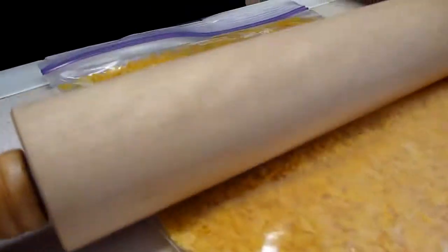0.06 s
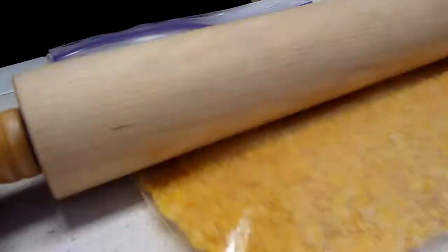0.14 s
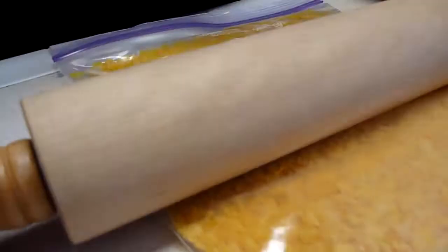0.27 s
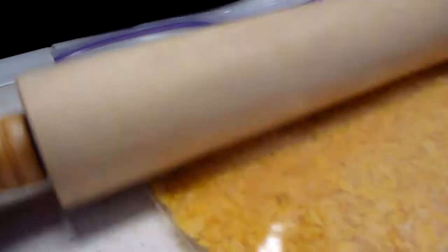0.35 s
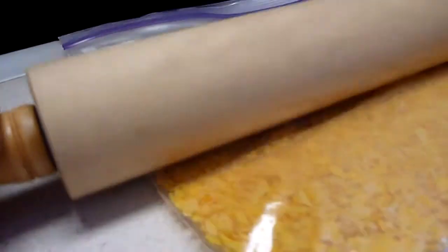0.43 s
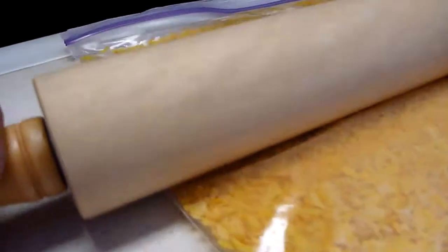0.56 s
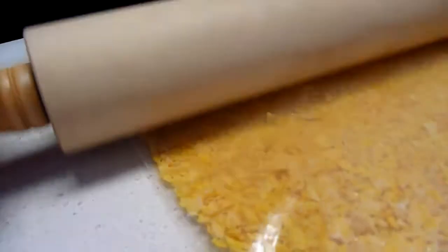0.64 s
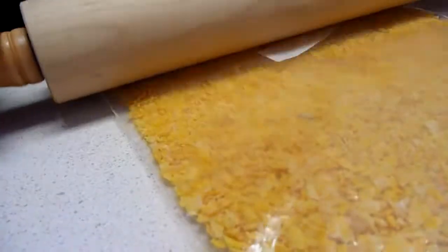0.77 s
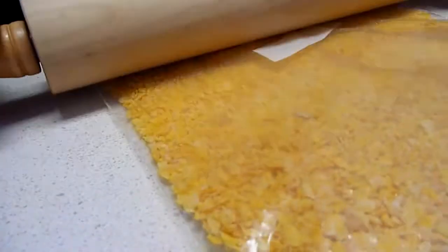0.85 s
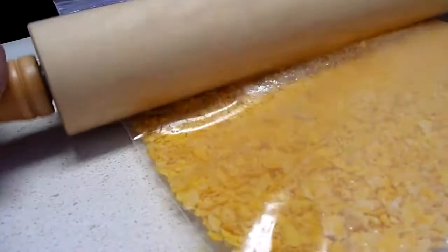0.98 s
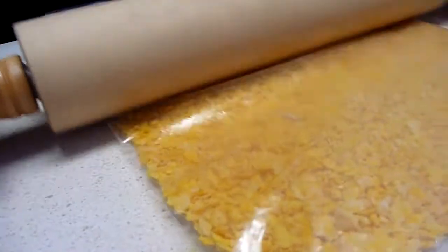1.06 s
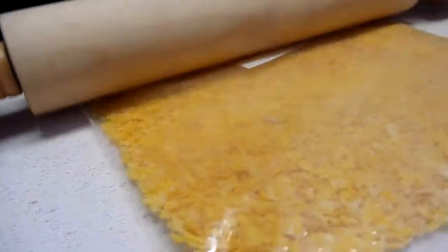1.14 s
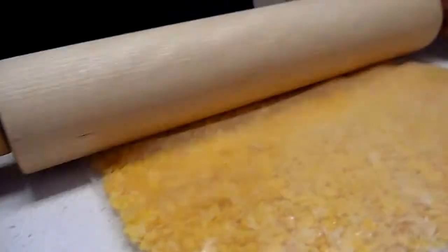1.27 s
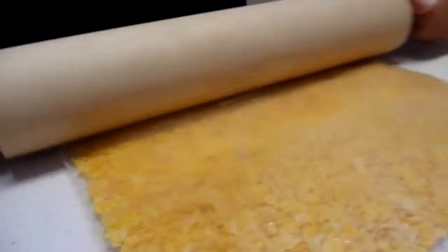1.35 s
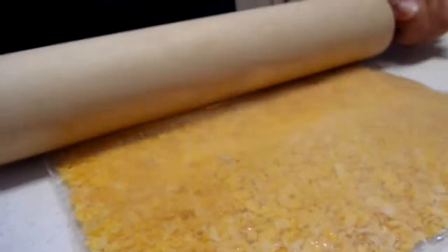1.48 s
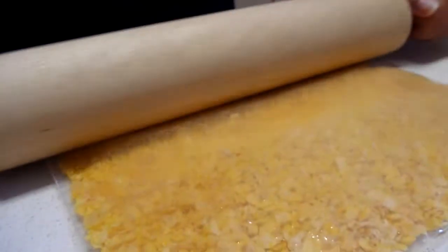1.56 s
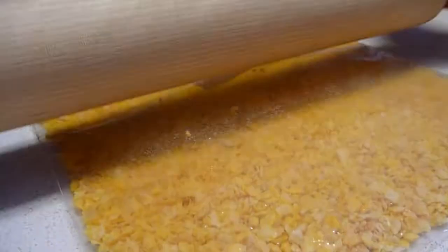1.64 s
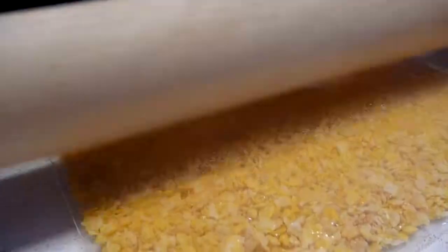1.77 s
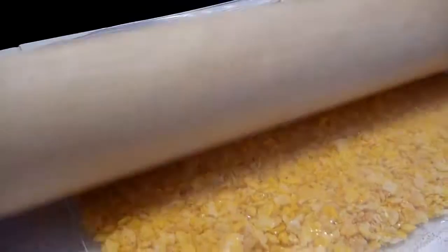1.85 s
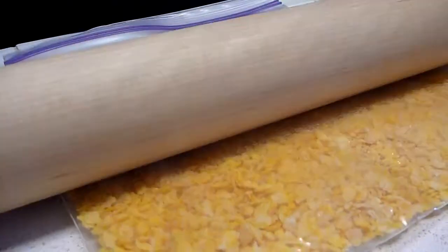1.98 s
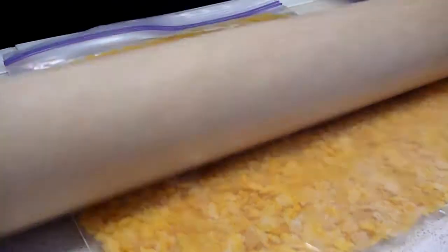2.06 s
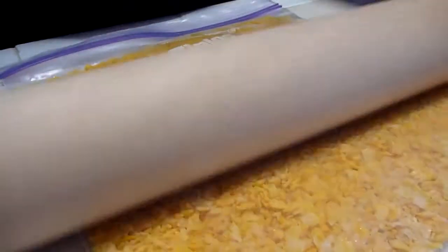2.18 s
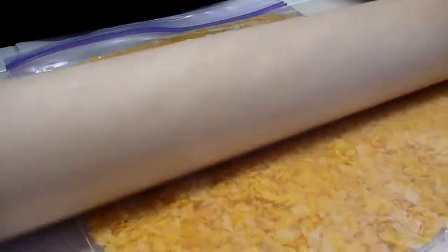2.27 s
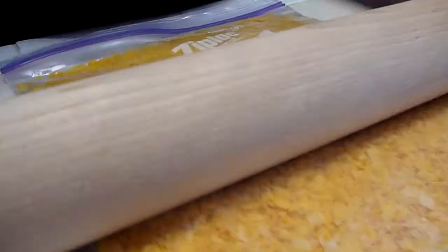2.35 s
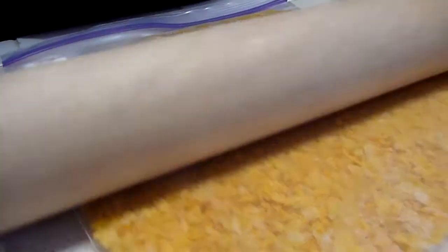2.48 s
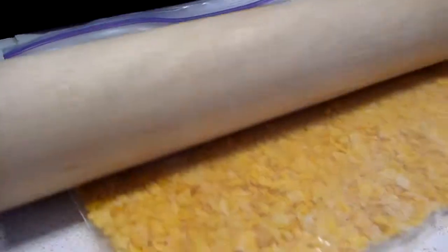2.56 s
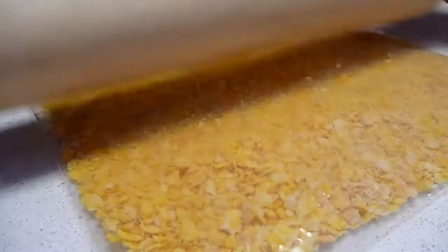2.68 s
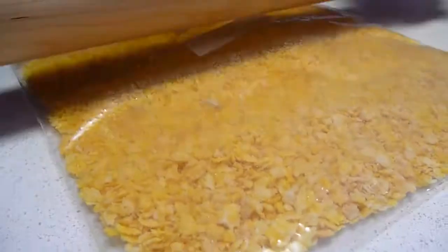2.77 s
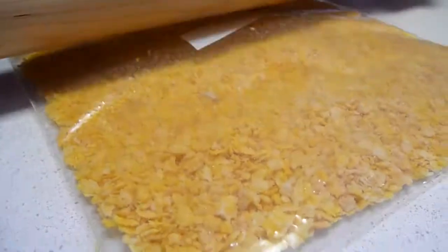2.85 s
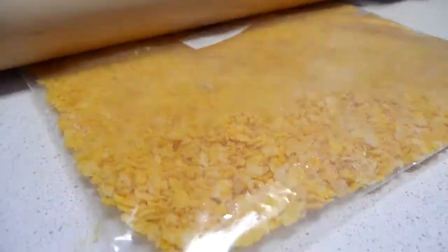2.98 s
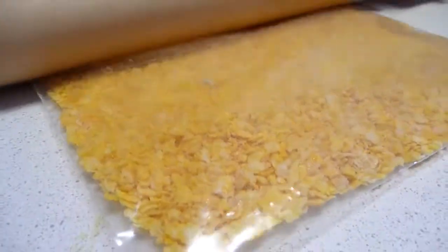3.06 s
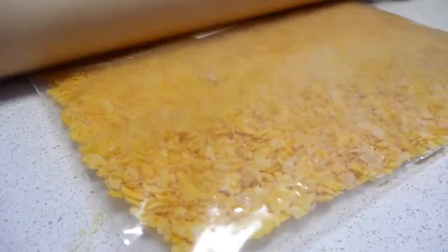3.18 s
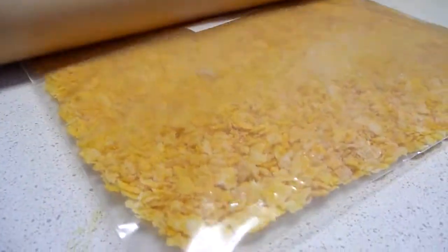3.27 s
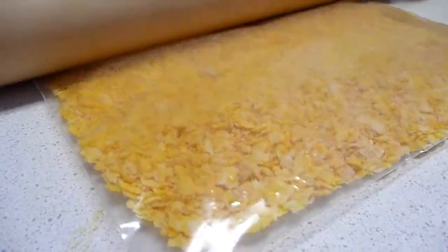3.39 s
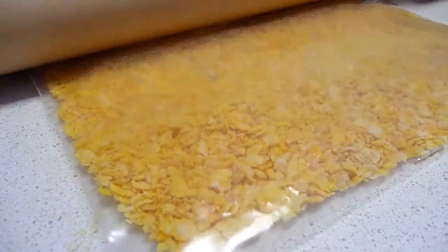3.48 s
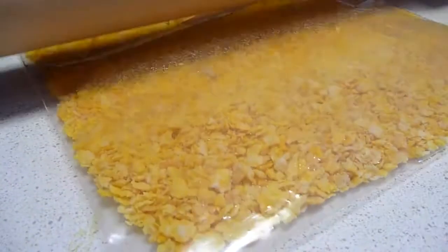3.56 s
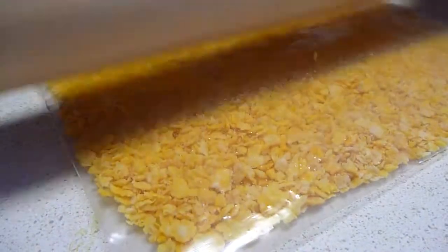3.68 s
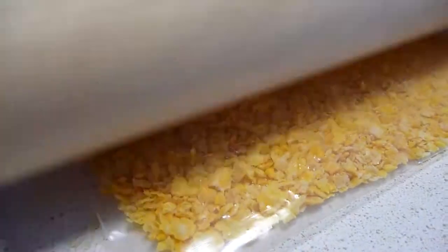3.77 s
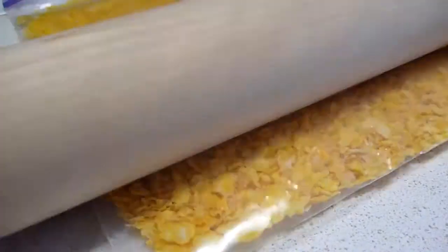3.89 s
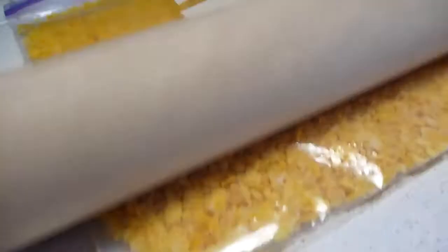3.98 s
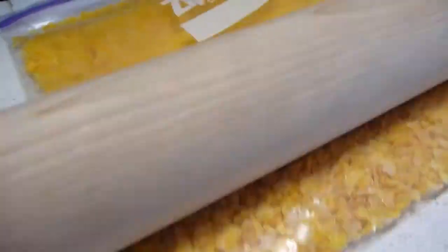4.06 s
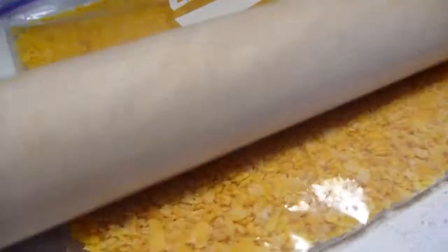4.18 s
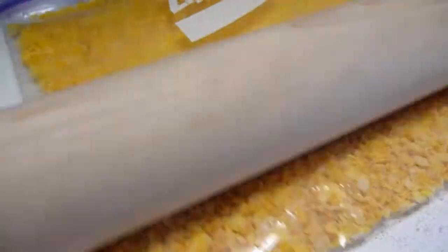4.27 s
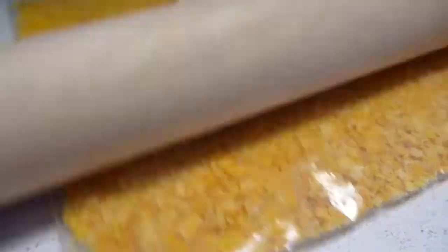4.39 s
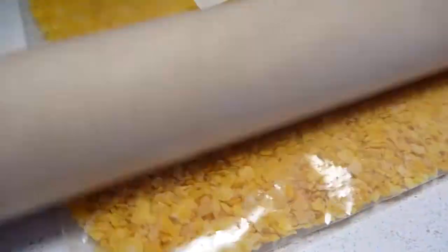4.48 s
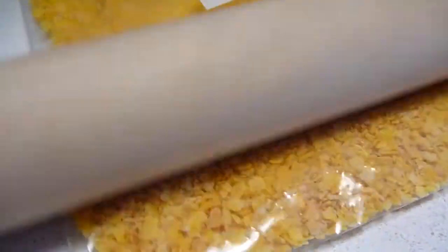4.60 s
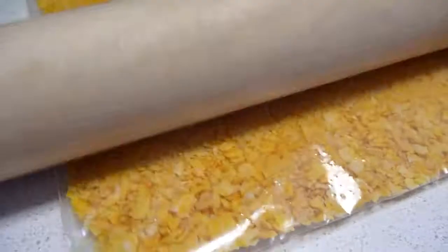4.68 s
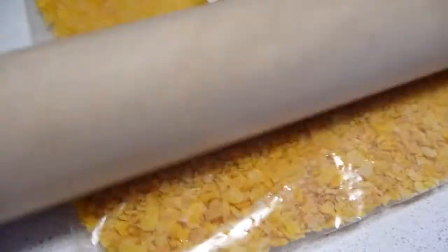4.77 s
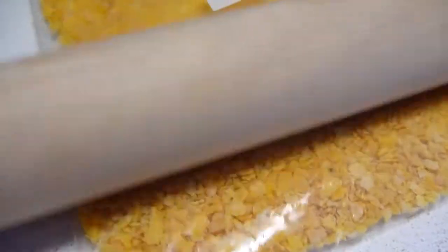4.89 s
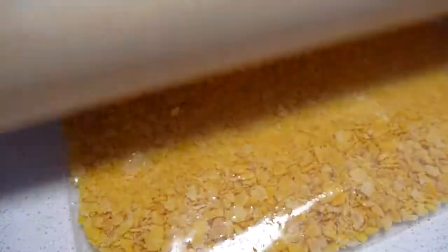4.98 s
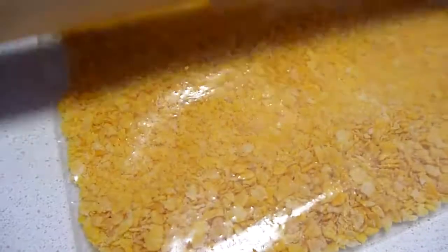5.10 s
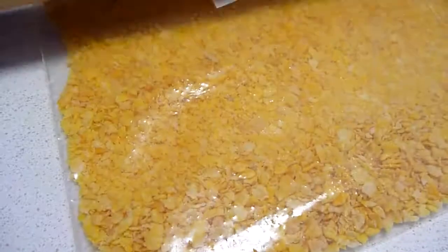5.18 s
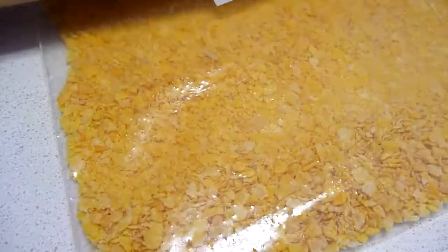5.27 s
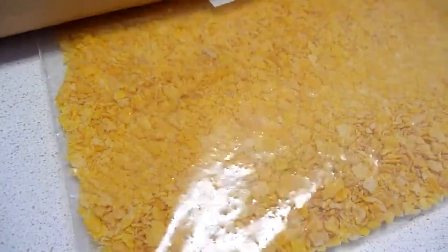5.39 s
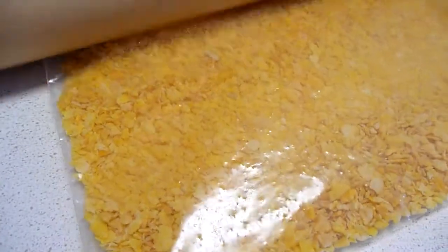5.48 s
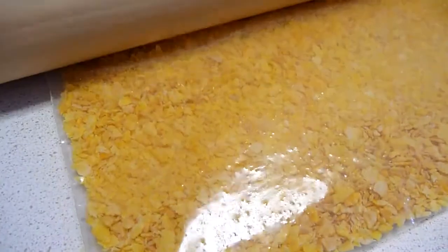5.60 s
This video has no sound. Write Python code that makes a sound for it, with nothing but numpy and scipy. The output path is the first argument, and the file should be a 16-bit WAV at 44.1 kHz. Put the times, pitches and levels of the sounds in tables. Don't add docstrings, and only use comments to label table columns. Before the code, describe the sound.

A wooden rolling pin crushes dry flakes in a plastic bag on a counter. Short, gritty crunches come in clusters, with sharp cracks and bright film ticks. Between passes the bag only rustles faintly. The pin knocks lightly, then more firmly, squeaks once, and finally clacks down hard near the end. Small quiet kitchen, close small microphone, mostly dry sound with little bass.

```python
import sys
import numpy as np
from scipy import signal
from scipy.fft import rfft, irfft, next_fast_len
from scipy.io import wavfile
from scipy.ndimage import map_coordinates

SR = 44100
rng = np.random.default_rng(int(sys.argv[2]) if len(sys.argv) > 2 else 0)


def to_wav(s):
    ch = np.atleast_2d(s).T
    pcm = np.round(np.clip(ch, -1, 1) * 32767)
    wavfile.write(sys.argv[1], SR, pcm.astype(np.int16))


def convert_level_to_amplitude(level_db):
    exponent = np.asarray(level_db, float) / 20
    return 10 ** exponent


N = 248724
STEP = 32


def unit(x):
    return x / np.sqrt(np.mean(x ** 2) + 1e-20)


def along(points, hz):
    f, v = np.transpose(points)
    return np.interp(np.log(hz + 1), np.log(f + 1), v)


def curves(rows):
    s, *cols = np.transpose(rows)
    return [np.interp(np.arange(N) / SR, s, c) for c in cols]


def wobble(rate):
    knots = rng.standard_normal(int(N * rate / SR) + 4)
    return map_coordinates(knots, [np.arange(N) * rate / SR])


def filtered(x, response):
    m = next_fast_len(N + SR // 2)
    return irfft(rfft(x, m) * response(np.fft.rfftfreq(m, 1 / SR)), m)[..., :N]


def body(x, modes):
    def response(f):
        total = 0
        for k, (centre, width, db) in enumerate(modes):
            loss = 1j * f * width
            total = total + (-1) ** k * convert_level_to_amplitude(db) * loss / (centre * centre - f * f + loss)
        return total
    return filtered(x, response)


def ringing(modes, t):
    t = np.maximum(t, 0)
    tones = sum(convert_level_to_amplitude(db - 60 * t / t60) * np.sin(2 * np.pi * hz * t) for hz, db, t60 in modes)
    return tones * (1 - np.exp(-t / 0.00029))


def bursts(starts, t60):
    t = np.arange(SR // 20) / SR
    return signal.fftconvolve(starts, convert_level_to_amplitude(-60 * t / t60))[:N] * rng.standard_normal(N)


def breaking(rate, spread_db):
    chance, size = rng.random(N), rng.exponential(size=N)
    sign = np.sign(rng.standard_normal(N))
    return (chance < rate / SR) * convert_level_to_amplitude(np.minimum(size, 4) * spread_db) * sign


def impulses(times, db):
    return np.bincount(np.round(np.asarray(times) * SR).astype(int), convert_level_to_amplitude(np.asarray(db)), N)[:N]


def scattered(level_db, count, above_db, scatter_db, range_hz):
    chance = rng.random((count, 3))
    work = np.cumsum(convert_level_to_amplitude(level_db))
    at = np.minimum(np.searchsorted(work, chance[:, 0] * work[-1]), N - 1)
    size_db = level_db[at] + above_db - scatter_db * np.log(chance[:, 1] + 0.15)
    low_hz, high_hz = range_hz
    return np.transpose([at / SR, size_db, low_hz + (high_hz - low_hz) * chance[:, 2]])


# f/Hz, level/dB per Hz
AIR = [(35, -66), (60, -16), (180, -17), (215, -5.5), (262, -13), (416, -8.5), (454, -15), (518, -8.5),
       (565, -10.5), (1590, -16.5), (2310, -12.5), (2880, -18.5), (11500, -27), (15000, -59), (22000, -120)]
# t/s, level/dB
SLIDE = [
    (5.12, -74),
    (5.2, -58),
    (5.29, -55),
    (5.32, -70),
]


def hum():
    hum_db = -52.5
    air = filtered(rng.standard_normal(N), lambda hz: convert_level_to_amplitude(along(AIR, hz)))
    stir = convert_level_to_amplitude(1.4 * wobble(6.2)) * body(rng.standard_normal(N), [(710, 810, 12.5), (2200, 740, -5.5)])
    rub = body(rng.standard_normal(N), [(3440, 370, 0), (4300, 500, -2)])
    slide = convert_level_to_amplitude(curves(SLIDE)[0] + 1.5 * wobble(200)) * unit(rub)
    return convert_level_to_amplitude(hum_db) * (unit(air) + 0.2 * unit(stir)) + slide


# f/Hz, t60/s
ROOM_DECAY = [(200, 0.4), (2400, 0.13), (10000, 0.066)]


def kitchen(x):
    hz, t, z = signal.stft(rng.standard_normal(SR // 2), SR, nperseg=256)
    decay = convert_level_to_amplitude(-60 * t / along(ROOM_DECAY, hz)[:, None])
    tail = signal.istft(z * decay, SR, nperseg=256)[1]
    delayed = np.pad(x, (200, 0))
    return signal.fftconvolve(delayed, tail / np.linalg.norm(tail))[:N]


# t/s, second partial level/dB, sixth partial level/dB
SQUEAK_LEVELS = [
    (3.55, -67, -72),
    (3.58, -50, -48),
    (3.6, -45, -45),
    (3.622, -44, -54),
    (3.642, -43, -56),
    (3.668, -53, -65),
    (3.705, -51, -67),
    (3.742, -54, -68),
    (3.77, -66, -76),
]
# multiple of the axle pitch, level/dB
AXLE_PARTIALS = [(1, -11), (2, 0), (3, -15), (4, -15), (5, -9), (6, -1.5), (7, -20), (8, -19), (9, -23),
                 (10, -19), (11, -20), (12, -27), (13, -23)]


def squeak():
    axle_hz, grip_per_s, grip_at_s, grip_depth_db = 677.5, 29.5, 3.603, 5
    second_db, sixth_db = curves(SQUEAK_LEVELS)
    t = np.arange(N) / SR
    gate = (t > SQUEAK_LEVELS[0][0]) * (t < SQUEAK_LEVELS[-1][0])
    pitch_hz = axle_hz * (1 + .003 * wobble(150) + .004 * wobble(30))
    phase = 2 * np.pi * np.cumsum(pitch_hz) / SR
    beat_db = grip_depth_db * np.cos(2 * np.pi * grip_per_s * (t - grip_at_s))
    others_db = .7 * second_db + .3 * sixth_db + 2.5
    out = np.zeros(N)
    for k, db in AXLE_PARTIALS:
        if k == 2:
            level_db = second_db + beat_db
        elif k == 6:
            level_db = sixth_db
        else:
            level_db = others_db + 3 * wobble(50)
        out += convert_level_to_amplitude(db + level_db) * np.sin(k * phase + k * k)
    return gate * np.sqrt(2) * out


# t/s, thud level/dB, clack level/dB, ring level/dB, ring f/Hz
BLOWS = [
    (1.547, -24, -14, -22, 2520),
    (2.955, -10.5, -6.5, -40, 2300),
    (5.3191, -8.5, 1, -15, 2370),
]
# f/Hz, level/dB, t60/s
THUD_MODES = [(378, 6.5, 0.014), (480, -14, 0.09)]
# f/Hz, level/dB, t60/s
CLACK_MODES = [(1520, 1.5, 0.005), (2320, -2.5, 0.012), (3310, -7, 0.01), (4280, -11, 0.0074),
               (5400, -17, 0.0062), (8980, -17, 0.012)]
# share of ring pitch, level/dB, t60/s
RING_MODES = [(1, -5, 0.1), (.94, -17, 0.32), (1.04, -22, 0.06)]


def knocks():
    clack_lag_s = .0018
    out, t = np.zeros(N + SR), np.arange(SR // 3) / SR
    for s, thud_db, clack_db, ring_db, hz in BLOWS:
        modes = [(share * hz, db, t60) for share, db, t60 in RING_MODES]
        ring = ringing(modes, t - clack_lag_s) * convert_level_to_amplitude(1.5 * wobble(120)[:len(t)])
        wood = convert_level_to_amplitude(clack_db) * ringing(CLACK_MODES, t - clack_lag_s) + convert_level_to_amplitude(ring_db) * ring
        out[round(s * SR):][:len(t)] += convert_level_to_amplitude(thud_db) * ringing(THUD_MODES, t) + wood
    return out[:N]


def swell(start, hold, db, drift_db, edges):
    rise_db_per_s, fall_db_per_s = edges
    t = np.arange(0, N + STEP, STEP) / SR - start[:, None]
    hold = hold[:, None]
    shape_db = drift_db[:, None] * (np.clip(t / hold, 0, 1) - .5)
    shape_db = shape_db - rise_db_per_s * np.maximum(-t, 0) - fall_db_per_s * np.maximum(t - hold, 0)
    return convert_level_to_amplitude(2 * np.maximum(db[:, None] + shape_db, -120))


# t/s, hold/s, crush level/dB, drift over hold/dB
LEANS = [(0.187, 0.06, -26, -6), (0.835, 0.019, -27, -1.5), (1.155, 0.101, -23.5, 3.5),
         (1.319, 0.074, -26, -1.5), (1.447, 0.067, -28.5, 0.5), (2.013, 0.118, -30.5, -11),
         (2.18, 0.053, -24, -9), (2.982, 0.122, -28.5, 8), (3.184, 0.045, -22.5, -0.5),
         (3.326, 0.04, -24, 5), (3.89, 0.117, -25.5, 2.5), (4.083, 0.105, -25, 3.5),
         (4.228, 0.039, -26, -7), (4.336, 0.053, -25.5, 2.5), (4.694, 0.094, -25, -2),
         (5.435, 0.082, -27, 2.5)]
# t/s, hold/s, crush level/dB, drift over hold/dB
BITES = [(0.054, 0.044, -24, 7.5), (0.268, 0.011, -30, 8), (0.31, 0.063, -23, -1.5),
         (0.407, 0.114, -25, -5), (0.876, 0.121, -23, -1), (1.047, 0.054, -23, 1), (1.922, 0.039, -22.5, 2),
         (2.254, 0.079, -26, 4), (2.378, 0.027, -28, -2.5), (2.413, 0.043, -21.5, 0), (3.268, 0.04, -25, 0),
         (4.424, 0.087, -24, -2), (4.578, 0.06, -24.5, 5.5)]
# t/s, hold/s, crush level/dB, counter thud level/dB, film level/dB
TOUCHDOWNS = [
    (1.544, .008, -33, 0.5, -6.5),
    (1.886, .012, -22, 1, -2.5),
    (2.954, .012, -25, 1, 0.5),
    (3.846, .018, -24, 5, -1),
    (5.312, .008, -35, -3, 2),
]
# t/s, hold/s, crush level/dB, drift/dB, film level over a push/dB
SETTLINGS = [(0, .045, -39, 0, 3), (0.557, .059, -42.5, 2, 4.5), (0.615, .006, -37.5, -0.5, 4),
             (0.662, .14, -49.5, 6.5, 12), (1.57, .07, -47, -11.5, -3), (1.858, 0.022, -54.5, 5, 11),
             (2.491, .1, -43, -2.5, 2), (2.594, .03, -42, -0.5, 5), (2.928, 0.014, -50, -0.5, 1.5),
             (3.4, .049, -44.5, 3.5, 2), (3.549, .25, -56.5, -4, 5.5), (3.827, .016, -45, 7.5, 4.5),
             (4.822, .077, -42, -4.5, 0.5), (5.301, 0.013, -46, 3.5, 0.5), (5.322, .1, -41, -3, -8),
             (5.542, .085, -39, -1.5, 1)]
# t/s, counter thud level/dB, film level/dB
PLACES = [
    (0, 0.9, -6.5),
    (.75, 0, -7),
    (1.8, 0.2, -8),
    (2.9, 1.6, -6.5),
    (3.8, 0.8, -6),
    (5.0, 0, -3.5),
]


def pressure():
    rustle_thud_db = -5.5
    film_lag, firm_db = 0.13, -29.5
    lean, bite, land, rustle, place = (np.transpose(rows) for rows in
                                       (LEANS, BITES, TOUCHDOWNS, SETTLINGS, PLACES))
    # rise, fall in dB/s
    power = np.vstack([swell(*lean, (410, 470)),
                       swell(*bite, (1900, 360)),
                       swell(*land[:3], 0 * land[0], (2200, 800)),
                       swell(*rustle[:4], (490, 295))])
    push_s = np.r_[lean[0], bite[0]]
    on_push = np.searchsorted(place[0], push_s, "right") - 1
    on_rustle = np.searchsorted(place[0], rustle[0], "right") - 1
    event_thud_db = np.r_[place[1][on_push], land[3], rustle_thud_db + place[1][on_rustle]]
    event_film_db = np.r_[place[2][on_push], land[4], rustle[4] + place[2][on_rustle]]
    total = power.sum(0)
    crush_db = 10 * np.log10(total)
    lag_db = -film_lag * np.maximum(crush_db - firm_db, -12)
    thud_db = event_thud_db @ power / total
    film_db = event_film_db @ power / total + lag_db
    return [np.repeat(db, STEP)[:N] for db in (crush_db, thud_db, film_db)]


# t/s, peak level/dB, f/Hz
CREASES = [(0.1845, -20, 8800), (0.1968, -18, 8000), (0.4568, -20, 8500), (0.5197, -18, 8200),
           (0.9954, -10, 8500), (1.008, -17, 8800), (1.2486, -18, 9400), (1.2556, -19, 8900),
           (1.438, -22, 9200), (1.4575, -23, 8800), (1.8876, -20, 9100), (1.8913, -18, 8800),
           (1.8942, -20, 8200), (2.0275, -21, 8300), (2.0439, -21, 9000), (2.379, -22, 7700),
           (2.4184, -20, 8000), (2.9564, -22, 8700), (2.9596, -14, 7900), (3.2757, -19, 9100),
           (4.0879, -21, 8500), (4.1078, -20, 8400), (4.1603, -20, 7900), (4.1934, -17, 8500),
           (4.4361, -16, 9000), (4.6509, -21, 8400), (5.3145, -23, 9300), (5.321, -9, 8500),
           (5.4624, -20, 8100), (5.5535, -12, 8000)]


def snaps():
    tick_t60_s = .0035
    out, t = np.zeros(N + SR), np.arange(SR // 100) / SR
    crush_db, _, film_db = pressure()
    lesser = scattered(crush_db + film_db, count=60, above_db=5, scatter_db=-4, range_hz=(6350, 9400))
    for s, db, hz in np.vstack([CREASES, lesser]):
        tick = np.sin(2 * np.pi * hz * t) + np.diff(rng.standard_normal(len(t) + 1))
        out[round(s * SR):][:len(t)] += convert_level_to_amplitude(db - 3.5 - 60 * t / tick_t60_s) * tick
    return out[:N]


# f/Hz, width/Hz, level/dB
COUNTER_MODES = [(212, 63, -2), (402.3, 67, -1.5), (507, 66, -1.5), (781, 160, -3.5)]
# t/s, peak level/dB, f/Hz, thud level/dB
LARGE_FLAKES = [(0.0562, -14, 1930, -6), (0.3109, -10, 2540, -6), (0.3436, -9, 1510, -6),
                (0.5198, -11, 1820, -6), (0.8786, -8, 2080, -6), (1.2098, -7, 2510, -6),
                (1.2633, -11, 2510, -6), (1.3326, -6, 2510, -6), (1.8927, -9, 2200, -6),
                (1.955, -9, 2470, -6), (1.9625, -6, 2580, -6), (2.3338, -11, 2440, -6),
                (2.4185, -8, 1590, -6), (2.4307, -9, 2590, -6), (2.4477, -9, 2310, -6),
                (2.9644, -14, 2200, -6), (3.1839, -9, 2630, -6), (3.2007, -10, 2230, -6),
                (3.2116, -9, 2650, -6), (3.2269, -8, 2530, -6), (3.3718, -12, 2360, -6),
                (3.8602, -12, 1630, -6), (4.1444, -10, 2440, -6), (4.1588, -10, 1630, -6),
                (4.1935, -6, 2570, -6), (4.4269, -12, 2510, -6), (4.4352, -8, 2500, -6),
                (4.6213, -11, 2660, -6), (4.6317, -10, 1610, -6), (4.8125, -15, 2230, -6)]


def cracks():
    click_hz, click_t60_s, lesser_thud_db = 2100, .003, 9.5
    out, t = np.zeros(N + SR), np.arange(SR // 20) / SR
    click = convert_level_to_amplitude(-60 * t / click_t60_s) * np.sin(2 * np.pi * click_hz * t)
    lesser = scattered(pressure()[0], count=90, above_db=3.5, scatter_db=2, range_hz=(1640, 2655))
    lesser_thuds_db = lesser_thud_db + 6 * rng.standard_normal(len(lesser))
    flakes = np.vstack([LARGE_FLAKES, np.c_[lesser, lesser_thuds_db]])
    for s, db, hz, _ in flakes:
        splinter = 0.091 * convert_level_to_amplitude(-60 * t / 0.0021) * rng.standard_normal(len(t))
        ring = ringing([(hz, -4, .011), (3500, -8, .004)], t)
        out[round(s * SR):][:len(t)] += convert_level_to_amplitude(db) * (splinter - click - ring)
    s, db, _, thud_db = flakes.T
    return out[:N] + body(impulses(s, db + thud_db + 17), COUNTER_MODES)


def propped():
    hush_db, hush_s = 3, .007
    t = np.arange(N) / SR
    s = np.append(np.transpose(LARGE_FLAKES)[0], np.inf)
    ahead = s[np.searchsorted(s, t)] - t
    return -hush_db * np.clip(1.5 - ahead / hush_s, 0, 1)


# f/Hz, width/Hz, level/dB
PIN_MODES = [(1310, 495, -6.5), (1757, 305, -1.5), (2423, 477, -0.5)]
# f/Hz, level/dB per Hz
FILM_SPECTRUM = [(1710, -8), (2900, -8.5), (3420, 2), (4010, -3.5), (4500, -2.5), (5580, -11.5),
                 (8770, -3.5), (11100, -9.5), (12000, 4.5), (12500, -46), (16200, -78), (22000, -120)]


def crush():
    crush_db, thud_db, film_db = pressure()
    shared = unit(bursts(abs(breaking(rate=1500, spread_db=3)), t60=.009))
    counter = body(shared + 0.98 * unit(breaking(rate=400, spread_db=2.5)), COUNTER_MODES)
    pitched = sum(body(unit(breaking(rate=500, spread_db=2.5)), [mode]) for mode in PIN_MODES)
    pin = body(shared, PIN_MODES) + .9 * pitched
    crinkle = unit(bursts(abs(breaking(rate=3100, spread_db=1.5)), t60=0.0056))
    film = filtered(0.69 * shared + crinkle, lambda hz: convert_level_to_amplitude(along(FILM_SPECTRUM, hz)))
    mix = convert_level_to_amplitude(thud_db - 1.72) * unit(counter) + unit(pin) + convert_level_to_amplitude(film_db - 1.0) * unit(film)
    return convert_level_to_amplitude(crush_db + propped() - 1.48) * mix


def scene():
    near, blows, axle = crush() + cracks() + snaps(), knocks(), squeak()
    to_room = convert_level_to_amplitude(-16.5) * near + convert_level_to_amplitude(-23) * blows + convert_level_to_amplitude(-16) * axle
    return (near + blows + axle + kitchen(to_room) + hum())[None]


def roll_off(x):
    return signal.sosfilt(signal.butter(12, 12870, fs=SR, output="sos"), x)


# f/Hz, width/Hz
MIC_NOTCHES = [(2890, 198), (7880, 97)]


def record(dry):
    def notch(f):
        return np.prod([(c * c - f * f) / (c * c - f * f + 1j * f * w + 1e-9) for c, w in MIC_NOTCHES], axis=0)

    def bass_cut(f):
        r = f / 120
        return ((1j * r) ** 2 / (1 + 1.4j * r - r ** 2)) ** 2

    x = filtered(dry, lambda f: notch(f) * bass_cut(f))
    rumble = unit(filtered(rng.standard_normal(N), lambda f: 1 / (1 + 1j * f / 60)))
    x = x + 0.055 * x ** 2 + convert_level_to_amplitude(-90) * rumble
    x = x / (1 + abs(x / .97) ** 8) ** (1 / 8)
    x = filtered(x, lambda f: 1 / (1 + (f / 11600) ** 80))
    return roll_off(x)


dry = scene()
out = record(dry)
to_wav(out)
```